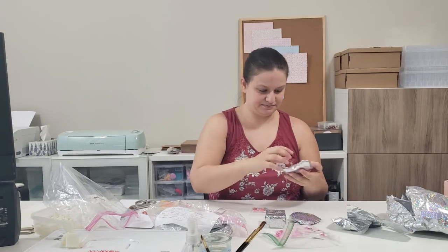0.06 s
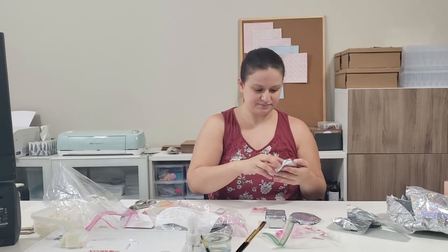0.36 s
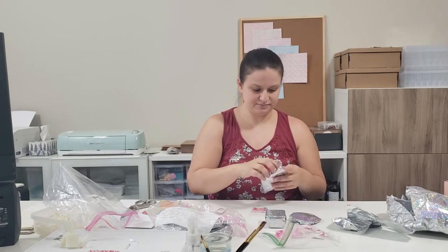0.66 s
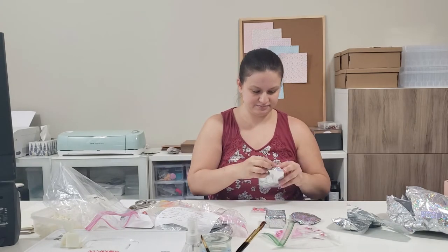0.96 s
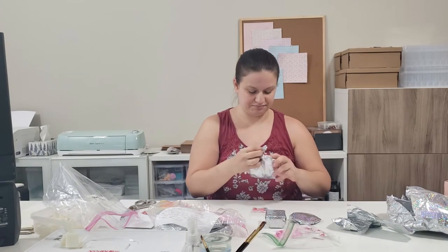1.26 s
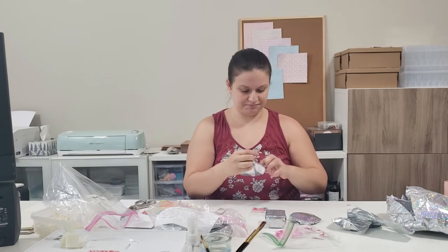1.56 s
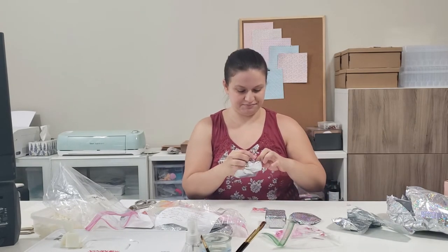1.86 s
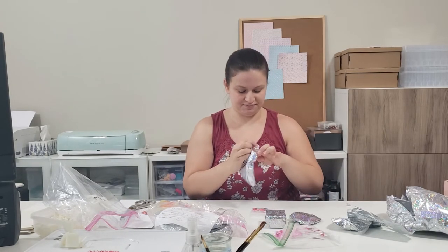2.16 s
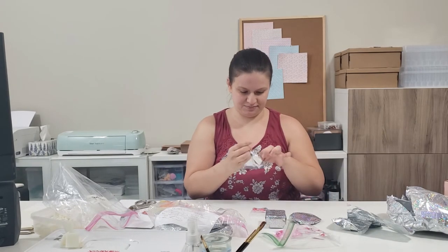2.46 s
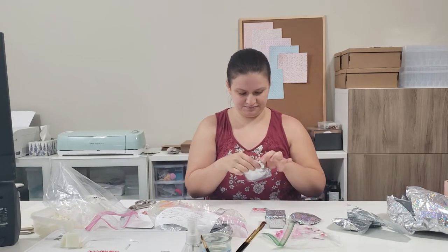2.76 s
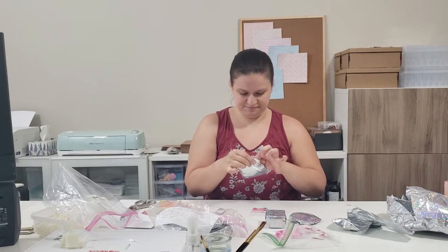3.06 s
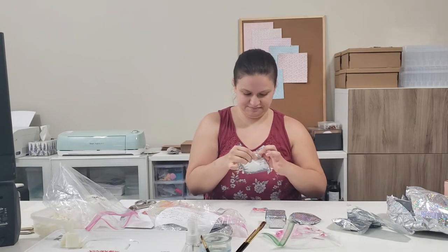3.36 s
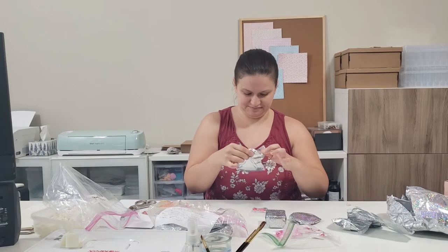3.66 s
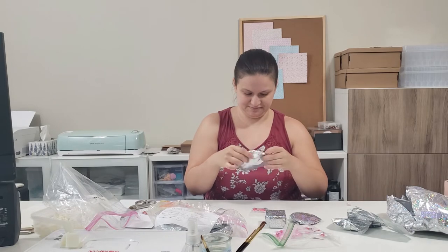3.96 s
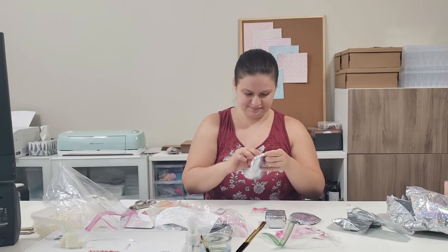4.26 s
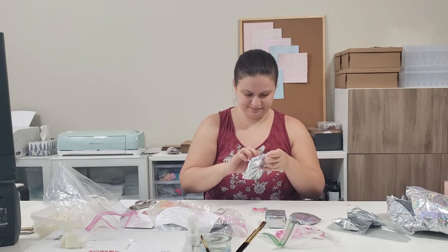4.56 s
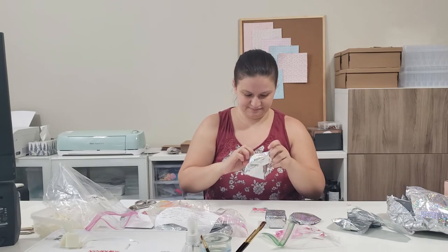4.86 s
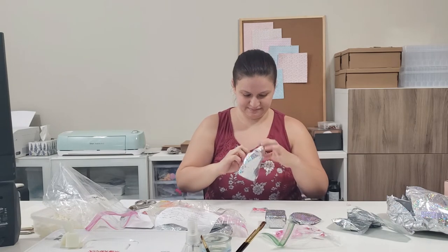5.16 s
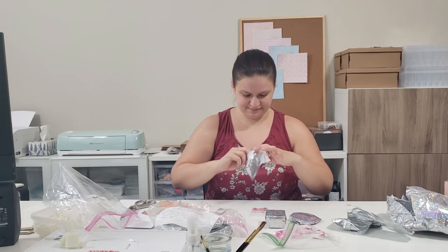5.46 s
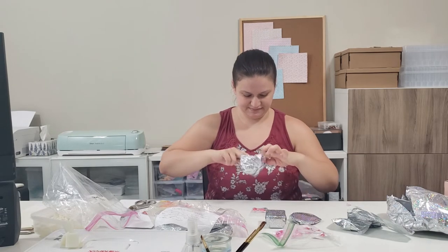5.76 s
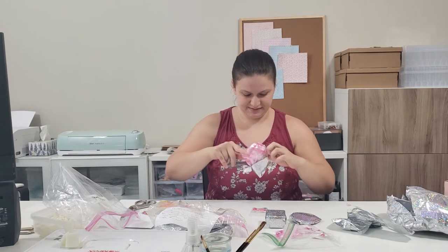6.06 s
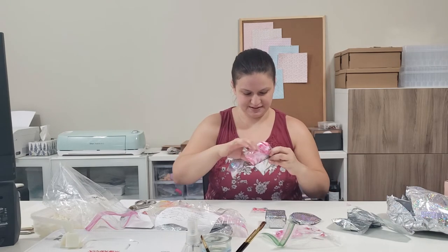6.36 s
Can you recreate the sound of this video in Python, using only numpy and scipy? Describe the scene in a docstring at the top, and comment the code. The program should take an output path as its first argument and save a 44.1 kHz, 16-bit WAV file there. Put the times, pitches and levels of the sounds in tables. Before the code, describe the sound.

In a small room with a short echo, stiff wrapping paper crackles in uneven little bursts as fingers work at a package. Sharp snaps stand out among the crinkles. Near the end the wrap is pulled open and torn with a louder rip, then pressed a few more times. Low ventilation noise and a mains hum continue throughout, all heard in stereo from a metre or two.

```python
"""Hands pick open a small package wrapped in stiff, sparkly paper, a metre or two from two microphones.
Ventilation rumbles and mains power hums throughout; a small, bare room draws every sound out.
From 0.3 s, each press buckles the paper in a burst of tiny clicks, and single creases snap.
At 4.5 s a long pull prises the wrap open. From 5.4 s a harder pull crowds the clicks into a rip,
loudest near 5.9 s. A few last presses follow."""
import sys
import numpy as np
from scipy import signal
from scipy.fft import rfft, irfft, next_fast_len
from scipy.io import wavfile
from scipy.ndimage import uniform_filter1d, map_coordinates

SR = 44100
rng = np.random.default_rng(int(sys.argv[2]) if len(sys.argv) > 2 else 0)


def unload_wav(signal):
    """Save mono or channel-first audio to the path in sys.argv[1] as 16-bit WAV at rate SR, clipped to [-1, 1]."""
    wavfile.write(
        sys.argv[1],
        SR,
        np.round(np.clip(np.atleast_2d(signal).T, -1, 1) * 32767).astype(np.int16),
    )


N = 286429

# Finger presses: start_s, length_s, effort_db, breadth (of the patch that gives: 0 narrow, 1 broad)
PRESSES = [(.278, .03, -59.5, 0), (.412, .035, -50.5, 0.24), (.538, .14, -58, 0.4), (.686, .1, -51.5, .9),
           (.88, .03, -54.5, 0.4), (.958, .055, -49, 0.4), (1.035, .095, -50, 0.64),
           (1.21, 0.25, -54.5, 0.27), (1.465, .05, -47.5, 0.28), (1.58, .118, -48.5, 0.3),
           (1.765, .145, -54.5, 0.2), (2.012, .085, -45, 0.32), (2.155, .085, -58, 0.2),
           (2.278, .065, -52, 0.12), (2.39, .165, -49.5, 0.5), (2.575, .105, -51.5, 0.67),
           (2.752, .06, -46.5, 0.67), (2.835, .04, -48.5, 0), (2.963, 0.089, -48, 0.24),
           (3.085, .155, -53, 0.56), (3.249, 0.022, -35, 0.1), (3.399, .042, -39, .6),
           (3.545, .135, -51, 0.62), (3.7, 0.082, -55.5, 0), (3.85, .148, -48, 0.63),
           (4.02, .12, -52, 0.23), (4.257, .04, -50.5, 0.05), (4.368, .088, -52.5, 0.77),
           (4.93, .033, -47.5, 0.36), (5.048, 0.065, -51.5, 0.32), (5.308, .06, -51.5, 0),
           (6.188, .078, -48, 0.5), (6.322, .07, -52, 0.8), (6.42, .065, -56.5, .35)]
# The loudest creases: start_s, crackle_db, sparkle_above_crackle_db
LOUD_SNAPS = [(.281, -68, 25), (.419, -47, 7), (.524, -58, 10), (.543, -52.5, 18), (.711, -52, 17),
              (.763, -52, 13), (.972, -45, 8), (.996, -38, -2), (1.047, -42, 4), (1.224, -60, 17),
              (1.377, -48, 10), (1.421, -41, -3), (1.502, -59, -6), (1.783, -48, 4), (1.988, -59, 16),
              (2.018, -46, -2), (2.16, -61, 13), (2.366, -55, 15), (2.397, -41, 5), (2.757, -49, 10),
              (2.796, -44, 4), (2.971, -43.5, 9), (3.029, -52, 11), (3.252, -29, -7), (3.259, -32, -13),
              (3.265, -27, -13), (3.56, -44, 13), (3.863, -42, 5), (3.953, -46.5, 12), (4.707, -41, 13),
              (4.791, -43, 8), (5.085, -62, 13), (5.436, -41, -7), (6.191, -43, 2), (6.431, -42, 1)]
# The pull that prises the wrap open, and the one that rips it: time_s, effort_db
PRISE_EFFORT = [(4.54, -53), (4.68, -49), (4.77, -43.5), (4.825, -40), (4.862, -45)]
RIP_EFFORT = [(5.428, -47.5), (5.53, -47.5), (5.63, -39.5), (5.7, -46), (5.82, -45), (5.878, -39.5),
              (5.902, -28), (5.942, -31), (5.968, -48), (6.01, -48), (6.052, -36), (6.085, -49.5)]
# Larger panels of paper that flex with a hollow note: start_s, pitch_hz, level_db
PANEL_NOTES = [(.89, 2010, -60.5), (1.056, 2650, -59), (1.646, 1680, -55), (1.676, 2630, -54),
               (2.077, 1430, -56), (2.601, 1310, -59), (2.767, 1420, -56), (6.02, 1110, -51),
               (6.36, 1600, -61)]
# The paper's three voices, from the whole sheet to its tiniest flat faces: pitch_hz, relative_level_db
SHEET_TONE = [(120, -50), (270, -9.5), (380, -5.5), (520, -2.5), (660, 0), (790, -8), (930, 0.5),
              (1070, -9.5), (1250, 2.5), (1800, -19), (3500, -58)]
CRACKLE_TONE = [(400, -22), (1050, -19), (1480, 4), (2100, 0), (2700, 1), (4200, 1), (5800, -1),
                (7200, -.5), (8400, -6), (11000, -5.5), (16000, -34)]
SPARKLE_TONE = [(4000, -77), (8000, -30), (9800, -8), (12300, 1), (14000, 0.5), (15500, 4.5), (17000, 1.5)]
# How long the room's echo takes to fade by 60 dB: pitch_hz, fade_s
ROOM_FADE = [(200, 0.24), (800, 0.29), (2000, 0.36), (5000, 0.31), (10000, 0.34), (16000, 0.23)]
# How alike sound from all sides is at the two microphones: pitch_hz, likeness (1 same, 0 unrelated)
STEREO_LIKENESS = [(50, 1), (250, 0.72), (500, 0.66), (1000, 0.03), (2000, 0.31), (5000, -0.027),
                   (12000, -0.18)]
# The rumble of moving air: pitch_hz, relative_level_db
RUMBLE_TONE = [(20, -27), (34, -21), (50, -4), (68, 3), (85, -9.5), (130, -8.5), (160, -18.5), (280, -19),
               (380, -18.5), (470, -27), (680, -32.5), (830, -38), (1900, -41), (2600, -34.5), (3400, -46),
               (8000, -48)]
# The notes of the steady hum: pitch_hz, level_db
HUM_NOTES = [(59.6, -67), (119.3, -66), (192, -73), (382.5, -76)]

USUAL_EFFORT_DB = -50
GRIP_S = 0.046  # time the fingers take to build up pressure
TOP_HZ = 15900


def buckling(moves, clicks_per_s, crowding, spread_db, life_s, settle_s, soft_start_db, most=116):
    """Each move of the fingers sets off a burst of clicks; more effort packs them closer together."""
    trains = np.zeros((3, N))
    for start_s, length_s, effort_db, breadth in moves:
        density = amp(crowding * (effort_db - USUAL_EFFORT_DB))
        count = min(4 + int(length_s * clicks_per_s * density), most)
        times = (np.arange(count) + rng.random(most)[:count]) * length_s / count
        sizes = amp(spread_db * np.clip(rng.standard_normal(most)[:count], -2, 2))
        sizes *= amp(-soft_start_db * np.exp(-times / GRIP_S))  # a negative setting gives a hard start
        # once the fingers ease off, the paper settles with a few weaker clicks
        late = length_s + rng.exponential(settle_s, size=12)
        times = np.r_[late, times]
        sizes = np.r_[np.full(len(late), amp(-4)), sizes]
        burst = clicks(times, sizes, life_s, variety_db=1.0) * np.sqrt(length_s * SR)
        levels_db, lowest_hz = patch_tone(effort_db, breadth)
        burst[1] = facets(burst[1], lowest_hz)
        add(trains, start_s, burst * amp(levels_db))
    return paper(trains, sheet_db=0.07, crackle_db=1.5, sparkle_db=5.5)


def clicks(times, sizes, life_s, variety_db, size=256, count=128):
    """Each click is a dying puff of noise, shared among three rows: sheet, crackle and sparkle."""
    age = np.arange(size)
    index = (np.round(times * SR).astype(int)[:, None] + age).ravel()
    # large parts of the sheet move slowly and evenly, the smallest in sharp, uneven jumps
    slowness = np.array([4, 2, 1])[:, None, None]
    unevenness = np.array([[.6], [.8], [1]])
    fade = np.exp(-age / (SR * life_s * slowness))
    shocks = rng.standard_normal((3, count, size))[:, :len(times)] * fade
    shares = amp(variety_db * rng.standard_normal((3, count))[:, :len(times)])
    shocks *= (sizes ** unevenness * shares)[..., None]
    trains = np.array([np.bincount(index, voice.ravel()) for voice in shocks])
    return trains / np.linalg.norm(trains, axis=1, keepdims=True)


def patch_tone(effort_db, breadth):
    """A broad patch flexes the sheet and rings low; a narrow one sounds thin and high."""
    extra_db = effort_db - USUAL_EFFORT_DB
    sheet_db = np.interp(breadth, [0, 1], [-20, -7.5]) + 0.15 * extra_db
    sparkle_db = np.interp(breadth, [0, 1], [1, 2.5]) - 0.038 * extra_db
    lowest_hz = np.interp(breadth, [0, 1], [3300, 1080])
    return effort_db + np.array([[sheet_db], [0], [sparkle_db]]), lowest_hz


def facets(train, lowest_hz):
    """Facets, the paper's small flat faces, barely ring below their lowest pitch; energy is kept."""
    low_cut = signal.butter(2, min(lowest_hz, SR / 4), "high", fs=SR, output="sos")
    thinned = signal.sosfilt(low_cut, train)
    return thinned * np.linalg.norm(train) / np.linalg.norm(thinned)


def paper(trains, sheet_db, crackle_db, sparkle_db):
    """Each of the paper's three voices rings in answer to its own train of clicks."""
    voices = zip(trains, (SHEET_TONE, CRACKLE_TONE, SPARKLE_TONE), (sheet_db, crackle_db, sparkle_db))
    return sum(amp(db) * signal.fftconvolve(train, ring(tone))[:N] for train, tone, db in voices)


def pull(effort, breadth, step_s=.0125):
    """A long pull is an unbroken run of short moves that follow the effort."""
    times, effort_db = np.transpose(effort)
    starts = np.arange(times[0], times[-1] - step_s / 2, step_s)
    return [(s, step_s, np.interp(s + step_s / 2, times, effort_db), breadth) for s in starts]


def snaps(creases, life_s, sheet_db, lowest_hz):
    """A crease pops through in one sharp click."""
    trains = np.zeros((3, N))
    for start_s, crackle_db, sparkle_db in creases:
        click = clicks(np.zeros(1), np.ones(1), life_s, variety_db=0, count=1)
        click[1] = facets(click[1], lowest_hz)
        add(trains, start_s, click * amp(crackle_db + np.array([[sheet_db], [0], [sparkle_db]])))
    return paper(trains, sheet_db=16, crackle_db=16.5, sparkle_db=22)


def small_creases(moves, count, below_effort_db, limit_db, sparkle_db, spread_db):
    """Small creases pop at random while the paper is worked, louder with effort, up to a limit."""
    starts, lengths, efforts, _ = np.transpose(moves)
    ends = np.cumsum(lengths)
    worked_s = (np.arange(count) + rng.random(count)) * ends[-1] / count
    move = np.searchsorted(ends, worked_s)
    times = starts[move] + ends[move] - worked_s
    level_db = np.minimum(efforts[move] - below_effort_db, limit_db)
    brighter_db = spread_db * (2 * rng.random(count) - 1)
    return list(zip(times, level_db - brighter_db / 2, sparkle_db + brighter_db))


def panels(width_hz, life_s, gain_db):
    """A panel of paper slips under a finger and rings with a note that dies quickly."""
    track = np.zeros(N)
    t = np.arange(SR // 10) / SR
    for start_s, pitch_hz, level_db in PANEL_NOTES:
        slip = rng.standard_normal(len(t)) * t * np.exp(-t / life_s)
        note = signal.lfilter(*signal.iirpeak(pitch_hz, pitch_hz / width_hz, fs=SR), slip)
        add(track, start_s, amp(level_db + gain_db) * unit(note))
    return track


def light_hold(start_s, effort_db, breadth, count=20):
    """The fingers never let go, so a run of faint moves lasts to the end."""
    length_s = (N / SR - start_s) / count
    return [(start_s + k * length_s, length_s, effort_db, breadth) for k in range(count)]


def straight_path(sound, lag_samples):
    """Sound coming straight from the paper reaches the left microphone a little later, and brighter."""
    side = np.array([[.5], [-.5]])
    balance = [(1000, -1.9), (4000, -1), (10000, 1.0)]  # pitch_hz, left_above_right_db
    delay_s = side * lag_samples / SR
    return filtered(sound, lambda hz: amp(side * along(balance, hz)) * np.exp(-2j * np.pi * hz * delay_s))


def room(sound, wall_delay_s, table_db, directions=4, block=256):
    """Clicks leave the paper in different directions, and each direction has its own echoes."""
    padded = next_fast_len(N + SR // 2)
    heading = rng.integers(directions, size=N // block + 1).repeat(block)[:N]
    echoes = 0
    for k in range(directions):
        hz, t, noise = signal.stft(surrounding_noise(SR // 2), SR, nperseg=256)
        fade = amp(-60 * t / along(ROOM_FADE, hz)[:, None])
        tail = signal.istft(noise * fade, SR, nperseg=256)[1]
        # only the table and its clutter answer before the walls do
        tail *= np.where(np.arange(tail.shape[1]) < wall_delay_s * SR, amp(table_db), 1)
        tail /= np.linalg.norm(tail, axis=1, keepdims=True)
        share = uniform_filter1d(1. * (heading == k), block // 2)
        echoes = echoes + rfft(sound * share, padded) * rfft(tail, padded)
    balance = [(400, -1.5), (1200, -2.4), (4000, -1.5), (10000, 0.76)]  # pitch_hz, left_above_right_db
    side_db = np.array([[.5], [-.5]]) * along(balance, np.fft.rfftfreq(padded, 1 / SR))
    return irfft(echoes * amp(side_db), padded)[:, :N]


def ventilation(rumble_db, drift_radians):
    """Moving air rumbles under a slightly unsteady mains hum."""
    t = np.arange(N) / SR
    air = unit(filtered(surrounding_noise(N), lambda hz: amp(along(RUMBLE_TONE, hz))))
    hum = 0
    for pitch_hz, level_db in HUM_NOTES:
        wander = map_coordinates(rng.standard_normal(int(2 * t[-1]) + 4), [2 * t])
        hum += amp(level_db) * np.sqrt(2) * np.sin(2 * np.pi * pitch_hz * t + drift_radians * wander)
    return amp(rumble_db) * air + hum


def surrounding_noise(size):
    """Noise from all sides: left and right are alike in the bass, nearly unrelated in the treble."""
    likeness = along(STEREO_LIKENESS, np.fft.rfftfreq(size, 1 / SR))
    angle = np.arccos(np.clip(likeness, -1, 1)) / 2
    mid, side = irfft(rfft(rng.standard_normal((2, size))) * [np.cos(angle), np.sin(angle)], size)
    return np.array([mid + side, mid - side])


def ring(tone, size=1024):
    """The short ring, of energy 1, that one tap makes in something with this tone."""
    cepstrum = irfft(np.log(amp(along(tone, np.fft.rfftfreq(size, 1 / SR)))))
    # move the energy as early as it can go, with none before the tap
    cepstrum[1:size // 2] *= 2
    cepstrum[size // 2 + 1:] = 0
    response = irfft(np.exp(rfft(cepstrum)))
    return response / np.linalg.norm(response)


def filtered(sound, response):
    """Multiply each frequency in a sound by response(hz)."""
    padded = next_fast_len(N + SR // 2)
    return irfft(rfft(sound, padded) * response(np.fft.rfftfreq(padded, 1 / SR)), padded)[..., :N]


def add(track, start_s, sound):
    """Mix a sound into a track."""
    start = max(round(start_s * SR), 0)
    part = track[..., start:start + sound.shape[-1]]
    part += sound[..., :part.shape[-1]]


def along(points, hz):
    """Read between the rows of a (pitch_hz, value) table, with octaves evenly spaced."""
    pitches, values = np.transpose(points)
    return np.interp(np.log(hz + 1), np.log(pitches), values)


def amp(db):
    """Turn decibels into a multiplier."""
    return 10 ** (np.asarray(db) / 20)


def unit(sound):
    """Scale a sound to an average power of 1."""
    return sound / np.sqrt(np.mean(sound ** 2) + 1e-20)


def scene():
    """Crumpling is heard mostly by way of the room; the sharp snaps face the microphones."""
    presses = list(PRESSES)
    hold = light_hold(start_s=.235, effort_db=-69, breadth=0.41)
    pulls = pull(PRISE_EFFORT, breadth=0.67) + pull(RIP_EFFORT, breadth=0.54)
    pressing = buckling(presses + hold, clicks_per_s=450, crowding=.6, spread_db=5.0,
                        life_s=0.00028, settle_s=.045, soft_start_db=2.5)
    tearing = buckling(pulls, clicks_per_s=380, crowding=.65, spread_db=7.0,
                       life_s=0.00022, settle_s=.03, soft_start_db=-3)
    crumple = pressing + tearing + panels(width_hz=250, life_s=0.0041, gain_db=-1.5)
    small = small_creases(presses + pulls, count=60, below_effort_db=7, limit_db=-46,
                          sparkle_db=12, spread_db=4)
    creases = snaps(list(LOUD_SNAPS) + small, life_s=0.00033, sheet_db=-29, lowest_hz=2930)
    straight_share = [(500, -1.0), (2000, -8.0), (6000, -9.0), (13000, -12.5)]  # pitch_hz, gain_db
    duller_crumple = filtered(crumple, lambda hz: amp(along(straight_share, hz)))
    near = straight_path(duller_crumple + creases, lag_samples=1.0)
    far = room(amp(-1.0) * crumple + amp(-3.0) * creases, wall_delay_s=0.0083, table_db=3.5)
    return near + far + ventilation(rumble_db=-57.0, drift_radians=0.99)


def record(dry):
    """Cut away all treble above TOP_HZ."""
    return filtered(dry, lambda hz: hz < TOP_HZ)


dry = scene()
out = record(dry)
unload_wav(out)
```